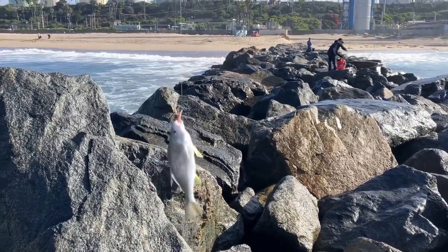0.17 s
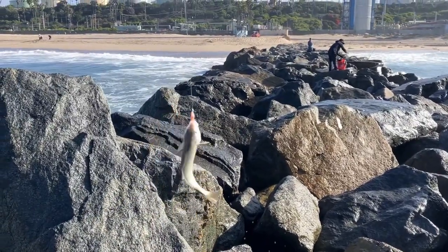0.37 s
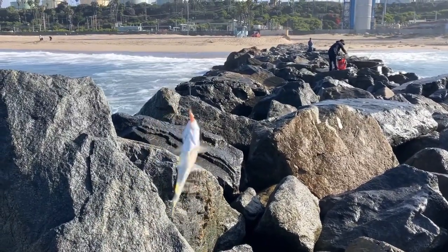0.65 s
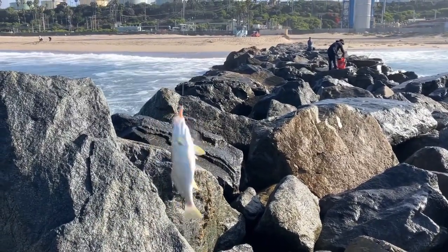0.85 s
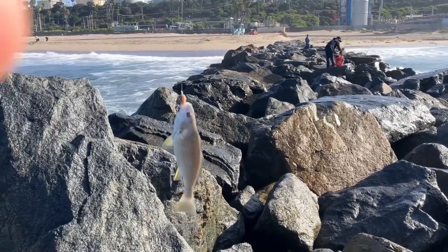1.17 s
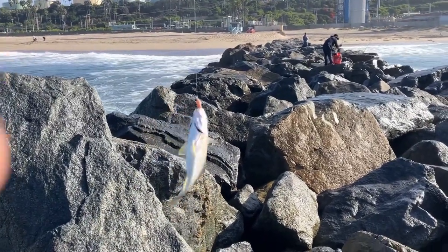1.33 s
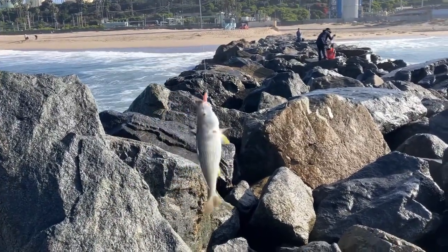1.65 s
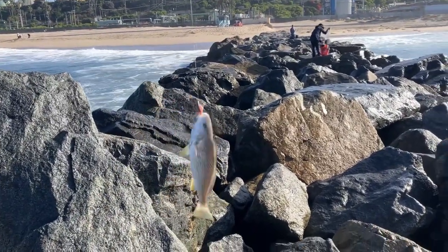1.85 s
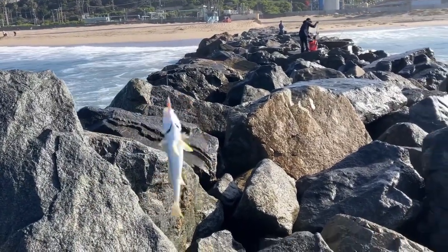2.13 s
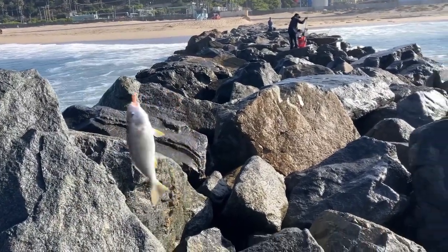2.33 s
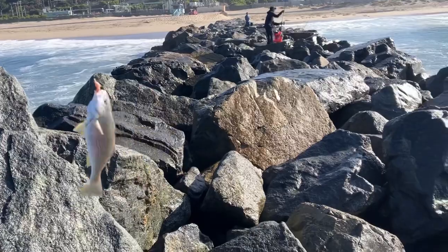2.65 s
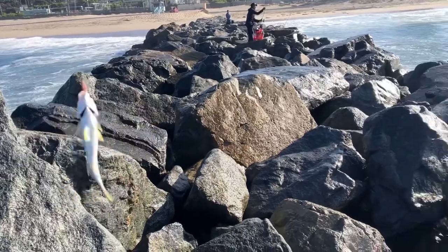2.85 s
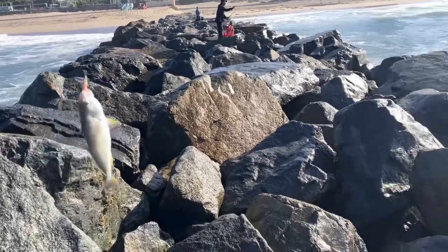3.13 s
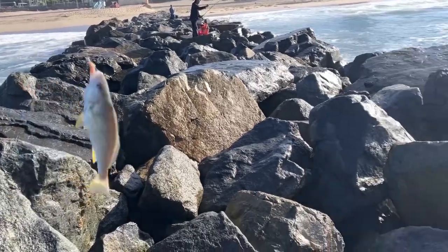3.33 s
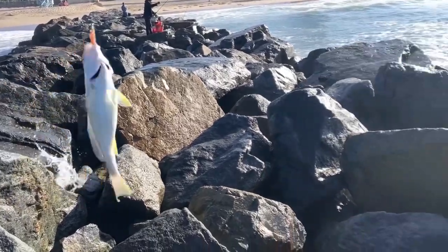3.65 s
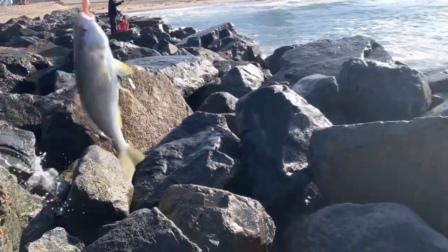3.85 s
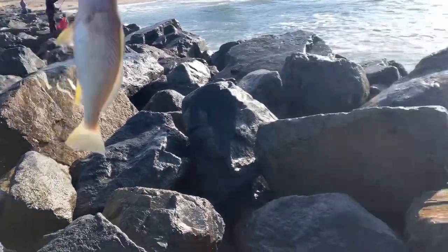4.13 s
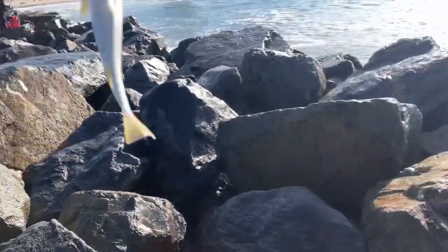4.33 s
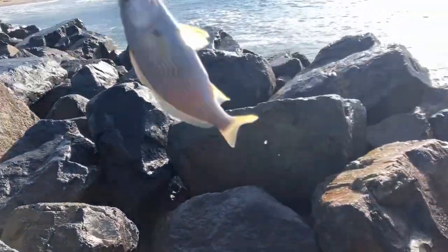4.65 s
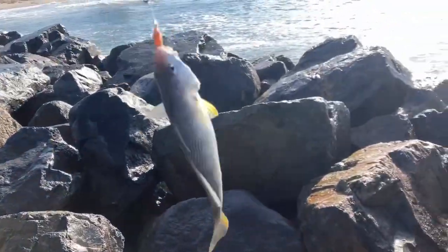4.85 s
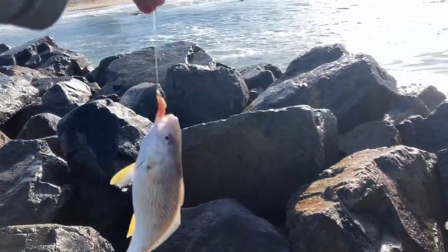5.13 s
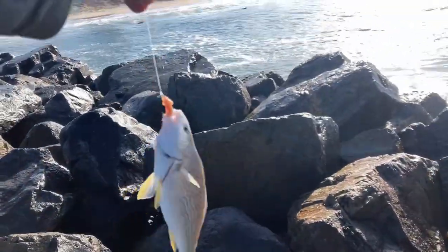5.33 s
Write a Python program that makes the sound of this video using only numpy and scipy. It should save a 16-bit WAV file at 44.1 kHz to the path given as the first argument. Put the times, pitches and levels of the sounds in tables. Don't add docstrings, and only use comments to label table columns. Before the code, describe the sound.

A swell booms low among jetty boulders, swelling mid-way into hissing spray and fizz, then draws back, with wind buffeting the microphone throughout.

```python
import sys
import numpy as np
from scipy import signal
from scipy.fft import rfft, irfft, next_fast_len
from scipy.io import wavfile
from scipy.ndimage import uniform_filter1d, map_coordinates

SR = 44100
rng = np.random.default_rng(int(sys.argv[2]) if len(sys.argv) > 2 else 0)


def undo_db(level):
    steps = np.asarray(level, float) / 20
    return 10 ** steps


def output_pcm(signal):
    pcm = np.clip(np.atleast_2d(signal).T, -1, 1) * 32767
    wavfile.write(sys.argv[1], SR, np.round(pcm).astype(np.int16))


N = 241976

# f/Hz, density/dB per Hz
BUFFET_SPECTRUM = [(18, -45), (27, -28), (40, -8), (56, 2), (81, 1.5), (130, -4.5), (170, -16), (290, -120)]
ROAR_SPECTRUM = [(60, -27), (110, -1.5), (160, -0.5), (300, -1.5), (450, -5.5), (560, -9), (690, -13),
                 (760, -24), (1000, -30), (1300, -44)]
WASH_SPECTRUM = [(300, -55), (600, 3), (1000, 1), (1400, -7), (2200, -9.5), (3200, -14), (4500, -15),
                 (6000, -26.5), (7000, -17), (8000, -50)]
FIZZ_SPECTRUM = [(800, -20), (1600, 4.5), (2600, -1.5), (4200, -2), (5800, -3.5), (7000, -1.5),
                 (8000, -0.3), (11000, 0.3), (15000, 1.8), (17000, -13)]
# f/Hz, likeness/1
WASH_LIKENESS = [(600, 1), (1100, 0.79), (2000, 0.44), (3200, 0.076), (4000, 0.74), (5600, 1)]
FIZZ_LIKENESS = [(2000, 0.08), (5500, 0.11), (6600, 1), (8000, 1), (16000, 0.95)]
# f/Hz, before the turn/rad, after it/rad
WASH_LEAD_RAD = [(0, 9.5, .1), (735, -0.3, 3.5), (967, 1.9, 2.64), (1260, 1.5, 2), (1640, 3.5, 2.1),
                 (3120, 7, 7.6), (3500, 5.5, 5.2), (4200, 7.5, 8.8), (5160, 8.5, 7.4), (6230, 10, 10)]
# f/Hz, lead/rad
FIZZ_LEAD_RAD = [(2600, 6.28), (7130, 0), (9050, -3.14), (11280, -6.28), (13760, -9.42), (15600, -12.57)]
# t/s, peak level/dB, f/Hz
DROP_HITS = [
    (3.186, -20, 3250),
    (3.6, -36, 4200),
    (4.22, -41, 1680),
]
# t/s, share of the turn/1
PHONE_TURN = [
    (0, 0),
    (4.15, 0.11),
    (4.6, 0.4),
    (5.49, 0.74),
]
# t/s, force level/dB
BREAKER_FORCE = [(0, -29.5), (0.4, -31), (1.18, -30.5), (1.3, -27.5), (1.55, -28.5), (1.84, -28.5),
                 (1.93, -25.5), (2.2, -24.5), (2.55, -21.5), (2.97, -21), (3.1, -22.5), (3.6, -22),
                 (3.75, -23.5), (4.05, -24.5), (4.24, -26), (4.4, -30.5), (4.85, -31.5), (5.49, -31.5)]
# t/s, level/dB
SPRAY_LEVEL = [(0, -49), (0.6, -50), (1.15, -48.5), (1.47, -54), (1.75, -47), (2.08, -41.5), (2.5, -41.5),
               (2.93, -38), (3.38, -39), (3.52, -38), (3.76, -39), (3.93, -40.5), (4.15, -42), (4.55, -46),
               (4.9, -47.5), (5.29, -49), (5.49, -46.5)]
# t/s, roar lift/dB, wash lift/dB
BOULDER_SLAPS = [(0.3, -1, 4), (0.66, 1.5, -3), (0.83, 1.5, 3), (0.96, 2, 1), (1.33, 0.5, -2),
                 (1.75, -1, 1.5), (1.92, 5, 3), (2.26, 2.5, 0), (2.38, -0.5, -2), (2.92, 2, 0.5),
                 (2.99, 3.5, 3), (3.08, -2, 6.5), (3.22, -1.5, 3), (3.53, 1, -0.5), (3.71, 0.5, 0),
                 (3.82, 1, 3), (4.16, 4.5, -1), (4.31, 4, -1), (4.49, 3.5, 1), (4.63, 4, 2.5), (5.3, 6, 0)]
# t/s, fizz lift/dB
SPLASH_LIFTS = [(0.3, 0), (0.93, 0.5), (1.92, -1.5), (2.14, 3.5), (2.38, 2.5), (2.54, 2.5), (2.66, 2),
                (2.79, 4), (2.89, 0), (2.98, 1.5), (3.06, 0), (3.17, -1.5), (3.26, 1.5), (3.48, 4.5),
                (3.59, 2.5), (3.7, 3.5), (4.0, 1.5), (4.12, 1.5), (4.3, 0)]
# t/s, peak level/dB
GUST_PEAKS = [(0.27, -29), (0.48, -31.5), (0.62, -31.5), (0.83, -36), (0.96, -36), (1.24, -26.5),
              (1.4, -29), (1.69, -26.5), (1.79, -24.5), (1.94, -22.5), (2.26, -27), (2.4, -24.5),
              (2.62, -25), (2.82, -22.5), (2.99, -22), (3.1, -25), (3.29, -23), (3.52, -22.5), (3.6, -27),
              (3.8, -27), (3.92, -25.5), (4.12, -23), (4.25, -28.5), (4.44, -28), (4.63, -27.5),
              (4.9, -27.5), (5.1, -28), (5.32, -25.5), (5.46, -26.5)]


def unit(x):
    return x / np.sqrt(np.mean(x ** 2) + 1e-20)


def along(points, hz):
    f, v = np.transpose(points)
    return np.interp(np.log(hz + 1), np.log(f + 1), v)


def curves(rows):
    s, *cols = np.transpose(rows)
    t = np.arange(N) / SR
    return [np.interp(t, s, c) for c in cols]


def wobble(knots_per_s):
    return map_coordinates(rng.standard_normal(400), [np.arange(N) * min(knots_per_s, 70) / SR])


def swells(rows, rise_s, fall_s):
    s, *lifts_db = np.transpose(rows)
    late_s = np.arange(N) / SR - s[:, None]
    return np.array(lifts_db) @ np.exp(-np.where(late_s < 0, -late_s / rise_s, late_s / fall_s))


def patchy(depth_db, bins, frames):
    z = signal.stft(rng.standard_normal((2, N)), nperseg=512)[2]
    field = rng.standard_normal(z.shape[1:])
    field = uniform_filter1d(field, round(bins), 0)
    field = uniform_filter1d(field, round(frames), 1)
    return signal.istft(z * undo_db(depth_db * unit(field)), nperseg=512)[1][:, :N]


def bursts(per_s, spread_db):
    when, size, sign = rng.random((3, 2, N))
    clicks = (when < per_s / SR) * undo_db(-spread_db * np.log(size + 1e-9))
    return unit(clicks * np.sign(sign - 0.5))


def bubbles(count, low_hz, high_hz, cycles, spread_db):
    when, pitch, size, port = rng.random((count, 4)).T[:, :, None]
    hz = low_hz * (high_hz / low_hz) ** pitch
    turns = np.arange(400) / SR * hz
    decay = turns * np.exp(-2.5 * turns / cycles)
    ping = np.sin(2 * np.pi * turns * (1 + 0.0562 * turns / cycles)) * decay
    ping = ping * undo_db(-spread_db * np.log(size + 0.0073)) * np.sqrt(hz)
    at = (when * (N - 400)).astype(int) + np.arange(400) + N * (port > 0.8)
    return unit(np.bincount(at.ravel(), ping.ravel(), 2 * N).reshape(2, N))


def heard(pair, spectrum, alike, lead_rad, left_db):
    m = next_fast_len(N + 8192)
    hz = np.fft.rfftfreq(m, 1 / SR)
    blend = np.arccos(np.clip(along(alike, hz), -1, 1)) / 2
    coloured = rfft(pair, m) * undo_db(along(spectrum, hz))
    mid, side = coloured * [np.cos(blend), np.sin(blend)]
    shift = undo_db(left_db / 2) * np.exp(0.5j * lead_rad(hz))
    return unit(irfft([(mid + side) * shift, (mid - side) / shift], m)[:, :N])


def gusts():
    lull_db, rise_db_per_s, fall_db_per_s = -39.5, 48, 71
    s, peak_db = np.transpose(GUST_PEAKS)[:, :, None]
    late_s = np.arange(N) / SR - s
    each_db = peak_db - np.where(late_s < 0, -late_s * rise_db_per_s, late_s * fall_db_per_s)
    return np.maximum(each_db.max(axis=0), lull_db)


def buffet(level_db):
    eddies = patchy(0.82, bins=1, frames=8)
    pressure = heard(eddies, BUFFET_SPECTRUM, [(60, 0.98)], lambda hz: 0 * hz, left_db=0.8)
    return undo_db(level_db + 1.83) * pressure


def wash(level_db, surge):
    fine = bubbles(count=6000, low_hz=913.5, high_hz=5914, cycles=15.7, spread_db=1.5)
    foam = unit(patchy(1.7, bins=4, frames=14)) + 0.23 * fine
    hz, *leads = np.transpose(WASH_LEAD_RAD)
    before, after = [
        heard(foam, WASH_SPECTRUM, WASH_LIKENESS, lambda f: np.interp(f, hz, lead), left_db=3.0)
        for lead in leads]
    turned = np.clip(curves(PHONE_TURN)[0], 0, 1)
    return undo_db(level_db + 3.5 + 1.0 * surge) * ((1 - turned) * before + turned * after)


def drops():
    out, t = np.zeros(N + 2000), np.arange(2000) / SR
    for s, db, hz in DROP_HITS:
        envelope = undo_db(db - 60 * t / 0.006) * (1 - np.exp(-t / 0.0002))
        out[round(s * SR):][:2000] += envelope * np.sin(2 * np.pi * hz * t * (1 + 6 * t))
    return out[:N]


def fizz(level_db, surge):
    hiss = patchy(0.95, bins=10, frames=8) * undo_db(0.5 * surge + 0.54 * wobble(13))
    spray = unit(hiss) + 0.63 * bursts(4000, spread_db=2.5)
    tiny = bubbles(count=8000, low_hz=1997, high_hz=15580, cycles=41.4, spread_db=3.0)
    spray = spray + 0.17 * tiny
    hz, lead = np.transpose(FIZZ_LEAD_RAD)
    near = heard(spray, FIZZ_SPECTRUM, FIZZ_LIKENESS, lambda f: np.interp(f, hz, lead), left_db=-0.5)
    return undo_db(level_db + 9.5) * near


def roar(level_db):
    churn = patchy(1.0, bins=1.6, frames=6)
    alike = [(150, 1.0), (400, 0.96), (700, 0.68)]
    boom = heard(churn, ROAR_SPECTRUM, alike, lambda hz: 0.0011 * hz, left_db=0.97)
    return undo_db(level_db + 0.27) * boom


def scene():
    (force_db,), (spray_db,), (turned,) = curves(BREAKER_FORCE), curves(SPRAY_LEVEL), curves(PHONE_TURN)
    boom_db, slosh_db = swells(BOULDER_SLAPS, rise_s=0.013, fall_s=0.023)
    splash_db, = swells(SPLASH_LIFTS, rise_s=0.029, fall_s=0.036)
    wash_db = -40 + 0.52 * (force_db - force_db.mean()) + 0.39 * (spray_db - spray_db.mean())
    wash_db = wash_db - 4 * turned
    surge = wobble(7)
    wind = buffet(gusts())
    shore = wash(wash_db + slosh_db, surge)
    near_foam = fizz(spray_db - 5.5 + splash_db, surge)
    breaker = roar(force_db + 0.83 + boom_db)
    return wind + shore + drops() + near_foam + breaker


def top_cut(x):
    return signal.sosfilt(signal.butter(12, 17090, fs=SR, output="sos"), x)


def record(dry):
    ceiling, top_hz = 0.65, 15800
    soft = dry / (1 + np.abs(dry / ceiling) ** 4) ** (1 / 4)
    spectrum = rfft(soft) * (np.fft.rfftfreq(N, 1 / SR) < top_hz)
    return top_cut(irfft(spectrum, N))


dry = scene()
out = record(dry)
output_pcm(out)
```